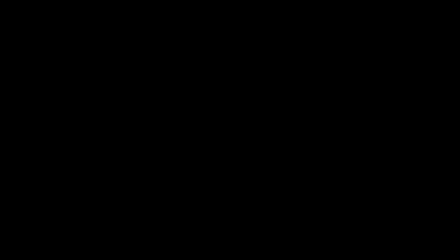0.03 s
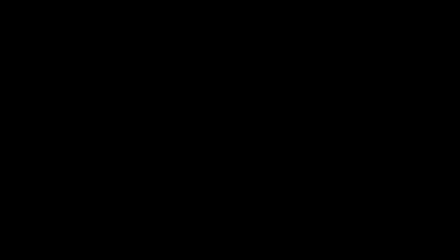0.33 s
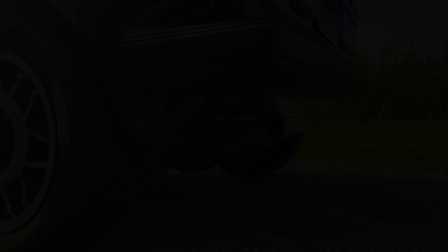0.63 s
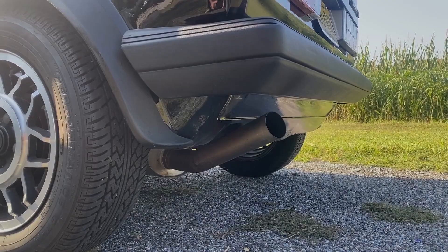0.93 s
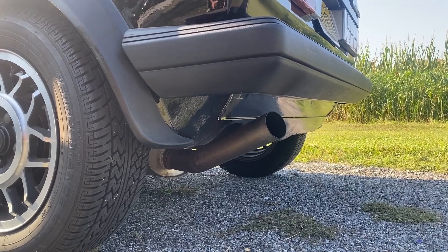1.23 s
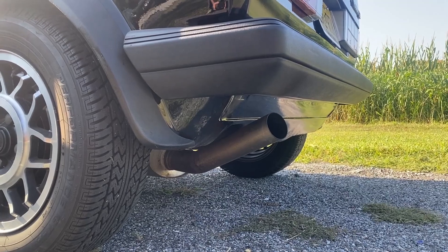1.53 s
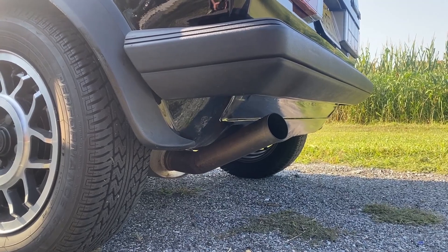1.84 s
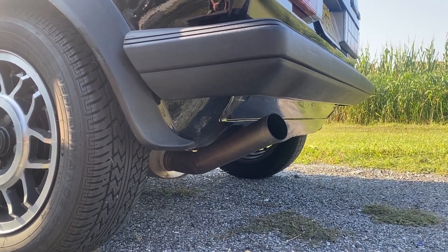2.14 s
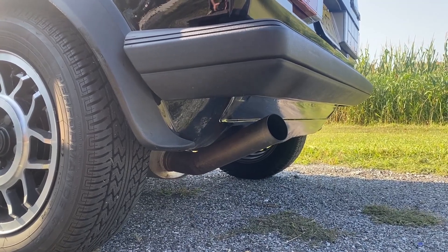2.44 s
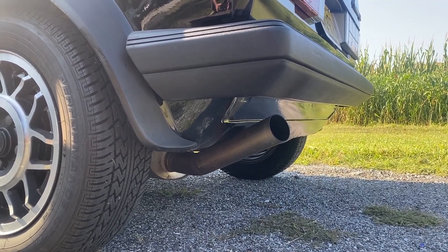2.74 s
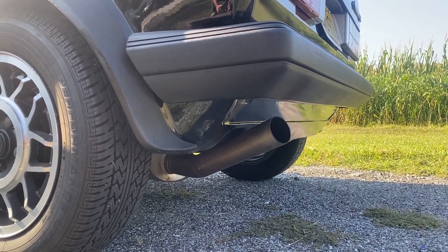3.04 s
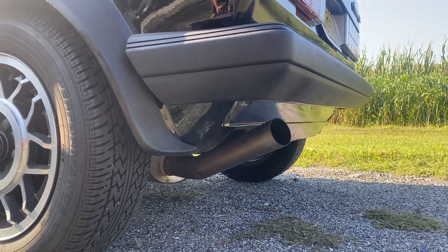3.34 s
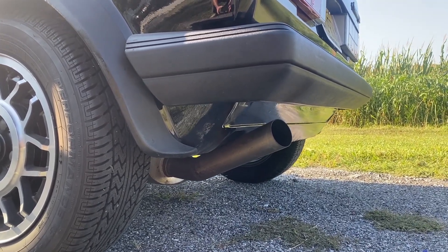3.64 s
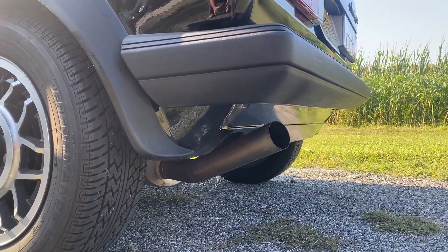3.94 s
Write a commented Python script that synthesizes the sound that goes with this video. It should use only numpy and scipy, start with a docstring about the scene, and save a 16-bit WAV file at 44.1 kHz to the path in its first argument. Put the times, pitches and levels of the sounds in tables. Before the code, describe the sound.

A car engine starts outdoors, heard close to the tailpipe. A click and a brief starter whine lead to uneven bangs as it catches, flares and settles into a low pulsing idle.

```python
"""Cold start of a four-cylinder car, heard close to the tailpipe on open ground.
Out of faint outdoor air the solenoid clicks at 0.6 s; the starter whines and grinds through three
compressions while unfired strokes puff from the pipe. From 1.1 s the engine clatters and catches in
pairs of bangs, each a boom of the pipe, a spit of gas and a zing of the steel tip.
It flares near 1.6 s and sinks to a pulsing idle by 2.4 s. A limiter holds the peaks."""
import sys
import numpy as np
from scipy import signal
from scipy.fft import rfft, irfft
from scipy.io import wavfile
from scipy.ndimage import uniform_filter1d, minimum_filter1d

SR = 44100
rng = np.random.default_rng(int(sys.argv[2]) if len(sys.argv) > 2 else 0)


def wav_out(sig):
    """Save sig, one row per channel (or a flat mono array), as 16-bit PCM at SR to the path in sys.argv[1]."""
    wavfile.write(sys.argv[1], SR, np.round(np.clip(np.atleast_2d(sig).T, -1, 1) * 32767).astype(np.int16))


N = 176400
T = np.arange(N) / SR
SIDES = np.array([[1], [-1]])   # left, right


def from_db(db):
    """Decibels to gain."""
    return 10 ** (np.asarray(db) / 20)


def pan(left_db):
    """Stereo gains for a left-minus-right level."""
    return from_db(SIDES * left_db / 2)


def in_time(rows, at=T):
    """A table's columns at the given times."""
    times, *columns = np.transpose(rows)
    return [np.interp(at, times, column) for column in columns]


def at_hz(points, hz):
    """A spectrum read on a log-frequency axis."""
    f, value = np.transpose(points)
    return np.interp(np.log(hz + 1e-3), np.log(f), value)


def drift(hz):
    """Random motion below hz, spread 1."""
    slow = signal.sosfilt(signal.butter(2, hz, fs=SR, output="sos"), rng.standard_normal(N + SR))[SR:]
    return slow / slow.std()


def strike(times, gains, shape):
    """One scaled copy of a shape at each time."""
    impulses = np.zeros(N)
    np.add.at(impulses, np.clip((times * SR).astype(int), 0, N - 1), gains)
    return signal.fftconvolve(impulses, shape)[:N]


# left-right coherence: f/Hz, coherence/0-1
STEREO_COHERENCE = [(100, .9997), (400, .97), (900, .68), (5500, .68), (7000, .82), (15000, .85)]
# left phase lead: f/Hz, phase/rad
STEREO_LEAD = [(0, 0), (1700, 0), (3200, 1.1), (5300, .8), (6700, 0), (8400, -3.1), (15800, -15.7)]
# left minus right: f/Hz, level/dB
STEREO_TILT = [(100, -2.5), (300, -5.5), (600, 2.5), (1200, 0), (3000, 1), (4800, 5), (6500, 1),
               (15000, -0.5)]


def noise(spectrum, rings=(), ripple_db=2, ripple_span_s=0.0086):
    """Stereo noise, rms 1, coloured by resonances and by reflections between ground and car body."""
    hz = np.arange(N // 2 + 1) * SR / N
    mid, side = rfft(rng.standard_normal((2, N)))
    coherence = np.clip(at_hz(STEREO_COHERENCE, hz), 0, 1)
    pair = np.sqrt(1 + coherence) * mid + SIDES * np.sqrt(1 - coherence) * side
    lead_rad = np.interp(hz, *np.transpose(STEREO_LEAD))
    place = pan(at_hz(STEREO_TILT, hz)) * np.exp(.5j * SIDES * lead_rad)
    low_cut = 1 / (1 + (spectrum[0][0] / 2 / (hz + 1)) ** 2)
    ripple = rfft(rng.standard_normal(N) * T * np.exp(-2 * T / ripple_span_s)).real
    db = at_hz(spectrum, hz) + ripple_db * ripple / ripple.std() * hz / (hz + 300)
    db += sum(boost / (1 + (2 * (hz - centre) / width) ** 2) for centre, width, boost in rings)
    coloured = irfft(pair * place * low_cut * from_db(db), N)
    return coloured / coloured.std()


# outdoor air: f/Hz, relative density/dB
AIR_SPECTRUM = [(30, -20), (70, -2), (120, -1), (155, -8.5), (195, -23), (250, -25), (450, -28.5),
                (740, -30.5), (880, -24), (1400, -41), (8000, -58.5), (15000, -77)]
# fade-in: t/s, level/dB
AIR_FADE = [(0, -110), (.12, -91), (.16, -69), (.3, -58.5), (.45, -51), (.58, -44.5), (.7, -39)]


def air():
    """Faint outdoor rumble fades in and stays."""
    db, = in_time(AIR_FADE)
    return from_db(db) * noise(AIR_SPECTRUM)


# air pumped out while cranking: t/s, level/dB
UNFIRED_STROKES = [(0.459, -38), (0.758, -16), (0.905, -12), (1.016, -8.5), (1.19, -9.5), (1.305, -8)]


def puffs(mode_hz=64, t60_s=0.22, rise_s=0.0076):
    """Unfired strokes ring only the pipe's lowest mode."""
    times, db = np.transpose(UNFIRED_STROKES)
    ring = np.sin(2 * np.pi * mode_hz * T) * from_db(-60 * T / t60_s) * (1 - np.exp(-T / rise_s))
    return strike(times, from_db(db), ring / ring.max())


# solenoid closing: t/s, level/dB, decay/s
SOLENOID_CLICKS = [(0.597, -38, 0.012), (.612, -25, 0.017), (.634, -40.5, 0.0075)]
# click: f/Hz, relative density/dB
CLICK_SPECTRUM = [(35, -35), (60, -16), (263, 2.5), (564, -12), (960, -5), (1520, -20), (1670, -23),
                  (2650, -14), (3500, -29), (5430, -30.5), (8230, -37), (9230, -29), (15000, -39)]


def solenoid():
    """A tick, the clack of the pinion and its rebound."""
    level = sum(from_db(db) * (T >= onset_s) * np.exp(-np.abs(T - onset_s) / decay_s)
                for onset_s, db, decay_s in SOLENOID_CLICKS)
    return level * noise(CLICK_SPECTRUM)


# starter gears: t/s, tooth rate/Hz, whine/dB, grinding/dB
CRANKING = [(.61, 197, -73, -48), (.65, 241.3, -56, -43.5), (.73, 279.6, -34, -44), (.81, 267.4, -47, -44),
            (.865, 238.7, -36, -38.5), (.885, 201.2, -29.5, -36.5), (.94, 177.9, -40.5, -45.5),
            (.975, 275.3, -45, -36), (1.015, 245.4, -29, -38), (1.04, 242, -62, -39.5),
            (1.12, 250, -58.5, -32), (1.3, 300, -42, -59)]
# whine partials: multiple of tooth rate, level/dB
WHINE_HARMONICS = [(1, -1), (2, 3), (3, -7), (4, -0.5)]
# bell housing resonances the whine sweeps through: f/Hz, gain/dB
BELL_HOUSING = [(210, -18), (280, -7), (350, -17), (420, 0.5), (485, -13), (560, -4), (640, -19), (730, -1),
                (960, 4.5), (1060, -7.5), (1160, -25)]
# grinding: f/Hz, relative density/dB
GRIND_SPECTRUM = [(120, -34), (200, -2.5), (560, -4), (636, -9), (946, -6.5), (1360, -19.5), (4010, -29),
                  (8570, -42), (9210, -36), (15000, -55)]
# starter housing: f/Hz, width/Hz, boost/dB
STARTER_RINGS = [(2100, 120, 6.1), (2620, 180, 7.1), (4000, 390, 5.2), (5000, 250, 8.5), (9400, 400, 5),
                 (14000, 900, 6)]


def starter(wobble=0.0091, roughness=0.28):
    """Rough gear whine and grinding; the motor sags and strains at each compression."""
    tooth_hz, whine_db, grind_db = in_time(CRANKING)
    phase = 2 * np.pi * np.cumsum(tooth_hz * (1 + wobble * drift(hz=60))) / SR
    whine = 0
    for k, db in WHINE_HARMONICS:
        gain = from_db(db + at_hz(BELL_HOUSING, k * tooth_hz))
        whine += gain * np.sin(k * phase) * (1 + roughness * drift(hz=70))
    grinding = noise(GRIND_SPECTRUM, STARTER_RINGS)
    engaged = (T > CRANKING[0][0]) & (T < CRANKING[-1][0])
    return engaged * (from_db(whine_db) * whine + from_db(grind_db) * grinding)


# engine under the car: f/Hz, relative density/dB
CLATTER_SPECTRUM = [(30, -2.5), (100, 6.5), (300, 8), (450, 5), (600, -2), (1100, -11), (2000, -15),
                    (3000, -24), (5000, -26.5), (15000, -36.5)]
# clatter before throb: t/s, level/dB
CLATTER_ENVELOPE = [(1.04, -70), (1.1, -25), (1.3, -23), (1.5, -17.5), (1.7, -28), (2.05, -32), (2.7, -28),
                    (4, -29.5)]


def clatter(times, depth=0.57, fall_s=0.021):
    """Mechanical noise that swells with each firing."""
    db, = in_time(CLATTER_ENVELOPE)
    throb = strike(times, 0.56, np.exp(-T[:SR // 4] / fall_s))
    return from_db(db) * (1 + depth * (2 * throb - 1)) * noise(CLATTER_SPECTRUM)


# first, uneven firings: t/s, boom/dB, load/0-1, hiss/dB
FIRST_FIRINGS = [(1.088, 3.007, 0.25, -21.5), (1.133, 2, 0.08, -16.5), (1.213, 2.997, 0.62, -17.5),
                 (1.251, 3, 0.53, -17.5), (1.328, 3, 0.47, -17.5), (1.366, 3, 0.7, -16),
                 (1.401, 3, 0.56, -17.5), (1.435, 3, 0.08, -16), (1.464, 3, 0.05, -17),
                 (1.491, 3, 0.75, -17), (1.517, 3, 0.9, -18), (1.54, 3.002, 1, -16)]
# running engine: t/s, firing rate/Hz
FIRING_RATE = [(1.56, 43.3), (1.64, 44.4), (1.79, 42.3), (1.9, 40.5), (2.03, 36.6), (2.2, 33.2),
               (2.45, 31.4), (2.72, 33.3), (3.2, 33.4), (3.45, 32.4), (3.7, 31.8), (4, 32.3)]
# running engine: t/s, boom/dB, load/0-1, hiss/dB
RUNNING_EFFORT = [(1.56, 4, 0.7, -21), (1.66, 1.5, 0.81, -31), (1.8, 0.5, 0.8, -39),
                  (1.93, -1.5, 0.64, -44.5), (1.97, -4.5, 0.32, -43), (2.04, -3, 0.11, -41.5),
                  (2.25, 1, 0.08, -33), (2.7, 0.5, 0.02, -28), (3.4, 1, 0.04, -31.5), (4, 1, 0.14, -29)]


def firings(runs_from_s=1.562, jitter_s=0.00012, boom_scatter_db=0.32, hiss_scatter_db=2.2):
    """The first catches, then one firing per half turn; returns t/s, boom/dB, load, hiss/dB."""
    rate_hz, = in_time(FIRING_RATE)
    running = T >= runs_from_s
    count = np.cumsum(rate_hz[running]) / SR
    times = np.interp(np.arange(int(count[-1]) + 1), count, T[running])
    boom_db, load, hiss_db = in_time(RUNNING_EFFORT, times)
    scatter = rng.standard_normal((100, 3))[:len(times)].T
    times += jitter_s * scatter[0]
    boom_db += boom_scatter_db * scatter[1]
    hiss_db += hiss_scatter_db * scatter[2]
    return np.hstack([np.transpose(FIRST_FIRINGS), [times, boom_db, load, hiss_db]])


# gas leaving the pipe: f/Hz, relative density/dB
GAS_SPECTRUM = [(150, 15), (400, 14), (600, 4.5), (800, 5.5), (1200, 3), (1700, -4), (2000, -2.5),
                (2600, -4), (3400, -2), (4200, -8.5), (4700, 0), (5200, -5), (5700, -8), (7000, -7),
                (7600, -8), (8600, -2), (10300, -7), (12000, -8), (15800, -6.5)]
# tailpipe: f/Hz, width/Hz, boost/dB
TAILPIPE_RINGS = [(1236, 150, 6.5), (1576, 130, 3), (1946, 116, 8), (4680, 120, -2), (5210, 98, 2),
                  (7620, 320, 5)]


def gas(times, hiss_db, lead_s=0.0059, rise_s=0.0084, fall_s=0.0047):
    """Each firing spits a burst of hiss, followed by its echo in the pipe and a faint wake."""
    echo_s, echo_db = 0.0084, -6.5
    wake_fall_s, wake_db = 0.043, -15.5
    t = T[:SR // 4]
    rise = np.minimum(t / rise_s, 1) ** 2
    spit = rise * np.exp(-np.maximum(t - rise_s, 0) / fall_s)
    echo = from_db(echo_db) * np.interp(t - echo_s, t, spit)
    wake = from_db(wake_db) * rise * np.exp(-t / wake_fall_s)
    power = strike(times - lead_s, from_db(hiss_db) ** 2, spit ** 2 + echo ** 2 + wake ** 2)
    return np.sqrt(np.abs(power)) * noise(GAS_SPECTRUM, TAILPIPE_RINGS)


# steel tip: f/Hz, level/dB re hiss, t60/s
STEEL_MODES = [(1624, -20, .08), (4685, -21, .06), (5250, -18, .08)]


def tip(times, hiss_db, scatter_db=4.5):
    """Firings set the pipe's tip zinging, now faintly, now clearly."""
    zing = 0
    for hz, mode_db, t60_s in STEEL_MODES:
        scatter = np.minimum(rng.standard_normal(200)[:len(times)], 2)
        ring = np.sin(2 * np.pi * hz * T) * from_db(-60 * T / t60_s)
        zing += strike(times, from_db(hiss_db + mode_db + scatter_db * scatter), ring)
    return zing * pan(left_db=2)


def pipe_ring(spectrum, size=32768):
    """Minimum-phase ring of a pipe with this spectrum, peak 1."""
    hz = np.arange(size // 2 + 1) * SR / size
    cepstrum = irfft(np.log(from_db(at_hz(spectrum, hz))))
    cepstrum[1:size // 2] *= 2
    cepstrum[size // 2 + 1:] = 0
    ring = irfft(np.exp(rfft(cepstrum)))[:size // 2]
    ring = signal.sosfilt(signal.butter(2, spectrum[-1][0], fs=SR, output="sos"), ring)
    return ring / np.abs(ring).max()


# one boom at idle: f/Hz, relative level/dB
IDLE_SPECTRUM = [(15, -58), (33, -43), (52, -1), (67, 1), (80, 8.5), (100, -11.5), (116, -8.5), (133, -10),
                 (167, -5.5), (195, -14.5), (212, -6), (233, -29), (270, -17.5), (335, -27), (400, -28),
                 (500, -58), (900, -56)]
# one boom under load: f/Hz, relative level/dB
LOADED_SPECTRUM = [(15, -45), (43, -8.5), (70, 14), (87, 1), (129, -11.5), (172, -2), (215, -15),
                   (260, -13.5), (350, -32.5), (600, -69)]


def booms(times, boom_db, load, lag_s=0.00298):
    """Each firing rings the pipe; under load the pressure front steepens into a short, leading bark."""
    bark_hz, bark_db, bark_width_s, bark_lag_s = 319, -4.5, 0.0016, 0.0023
    idle = strike(times + lag_s, from_db(boom_db) * (1 - load), pipe_ring(IDLE_SPECTRUM))
    loaded = strike(times + lag_s, from_db(boom_db) * load, pipe_ring(LOADED_SPECTRUM))
    half_s = 0.008
    t = T[T < 2 * half_s] - half_s
    front = np.cos(2 * np.pi * bark_hz * t) * np.exp(-.5 * (t / bark_width_s) ** 2)
    bark = strike(times + bark_lag_s - half_s, from_db(boom_db + bark_db) * load ** 2, front)
    return -signal.sosfilt(signal.butter(1, 10, "high", fs=SR, output="sos"), idle + loaded + bark)


def scene():
    """Outdoor air, starter, engine and exhaust, in stereo."""
    times, boom_db, load, hiss_db = firings()
    outdoors = air()
    pipe = (puffs() + booms(times, boom_db, load)) * pan(left_db=-1.16)
    exhaust = pipe + gas(times, hiss_db) + tip(times, hiss_db)
    return outdoors + exhaust + clatter(times) + starter() + solenoid()


def record(dry, ceiling=0.89, release_db_per_s=513, cutoff_hz=15900):
    """Fast look-ahead peak limiter, then a steep low-pass."""
    over_db = 20 * np.log10(np.maximum(np.abs(dry).max(axis=0) / ceiling, 1))
    release_db = release_db_per_s * T
    held_db = np.maximum.accumulate(over_db + release_db) - release_db
    gain = uniform_filter1d(minimum_filter1d(from_db(-held_db), size=65), size=65)
    return signal.sosfilt(signal.ellip(12, .1, 80, cutoff_hz, fs=SR, output="sos"), dry * gain)


dry = scene()
out = record(dry)
wav_out(out)
```